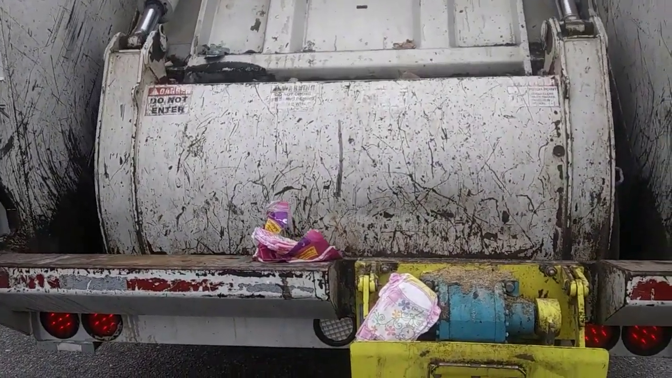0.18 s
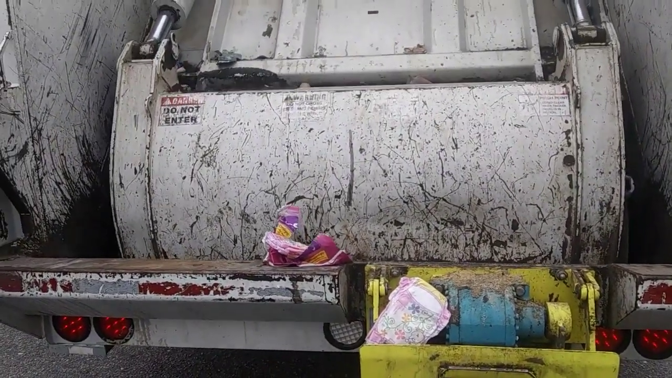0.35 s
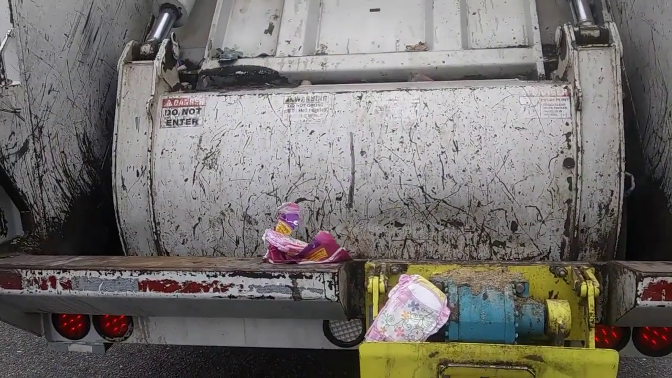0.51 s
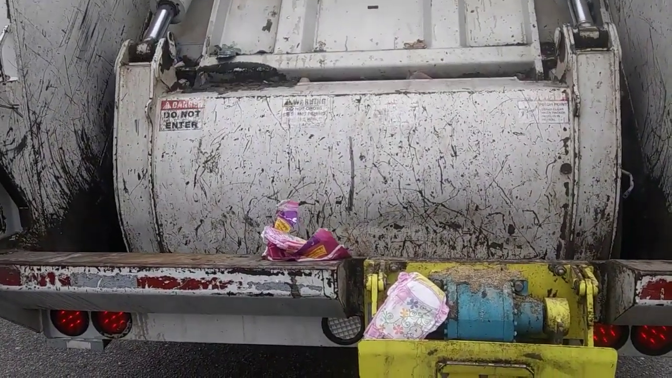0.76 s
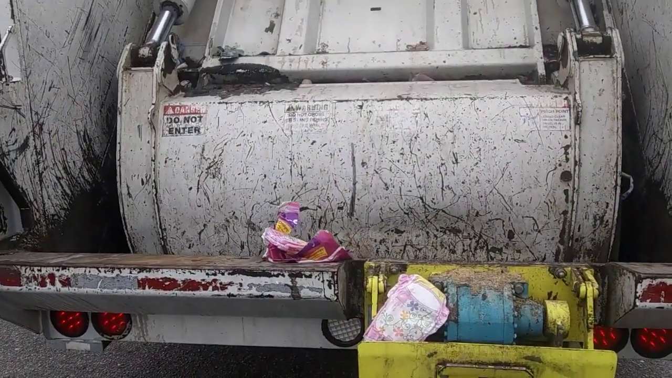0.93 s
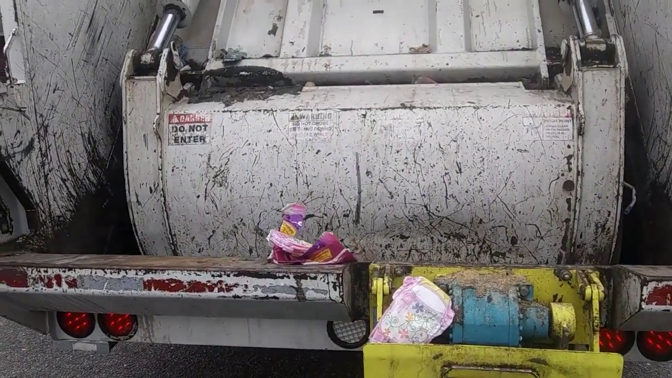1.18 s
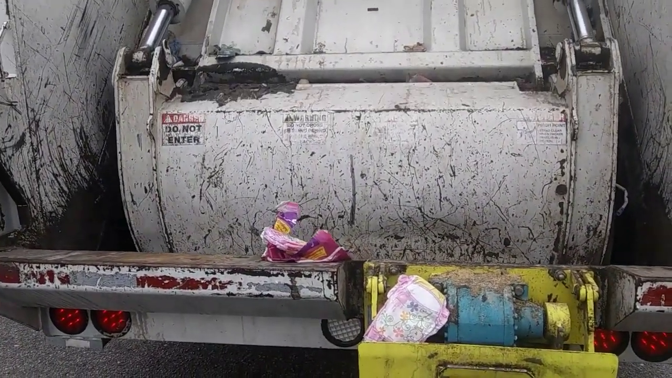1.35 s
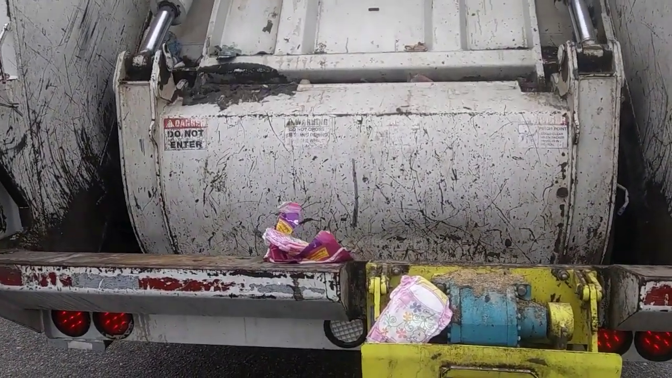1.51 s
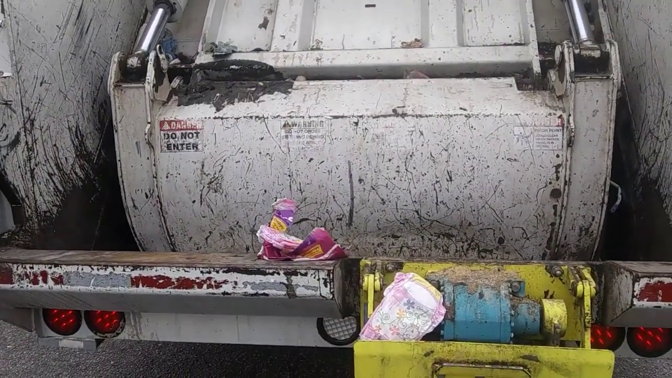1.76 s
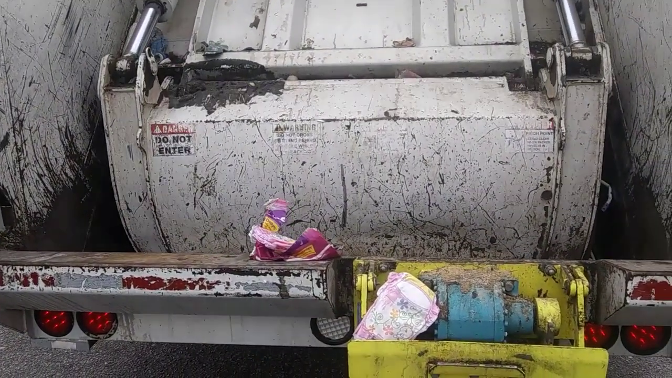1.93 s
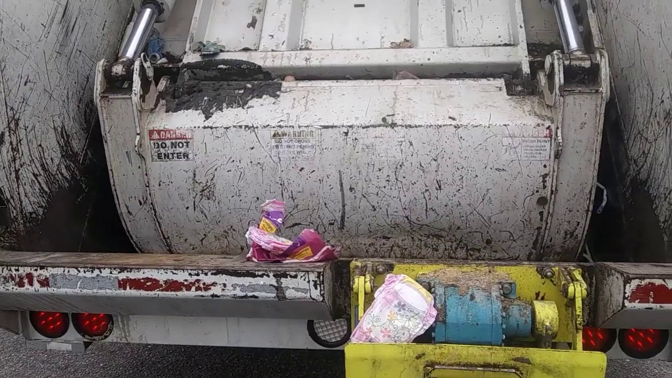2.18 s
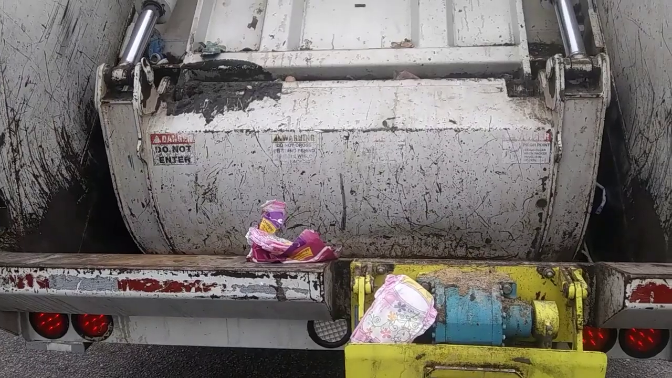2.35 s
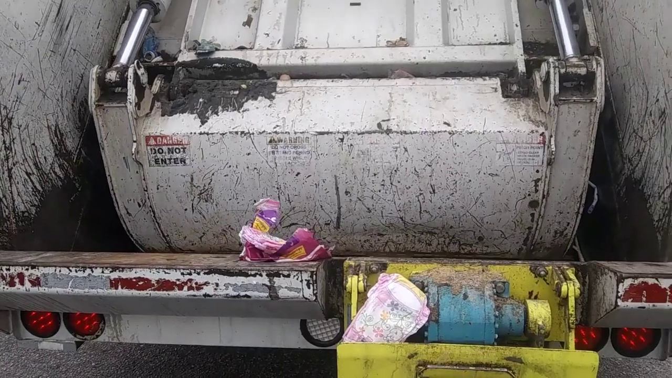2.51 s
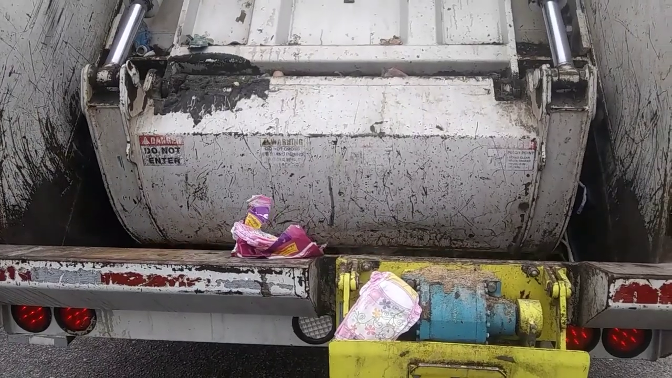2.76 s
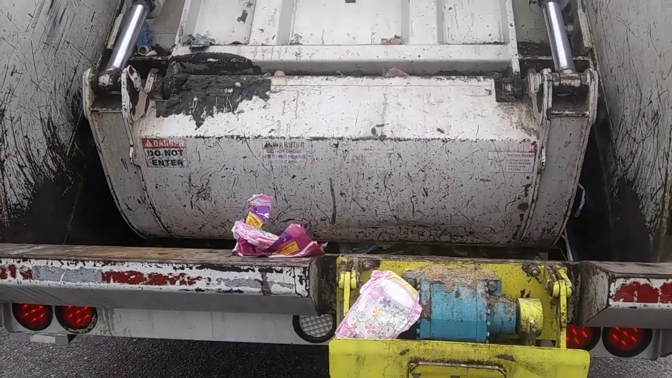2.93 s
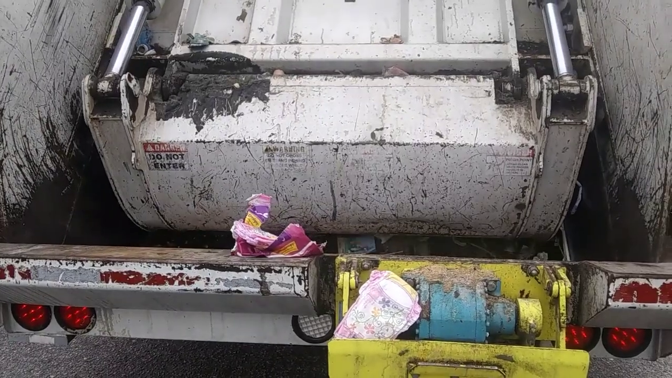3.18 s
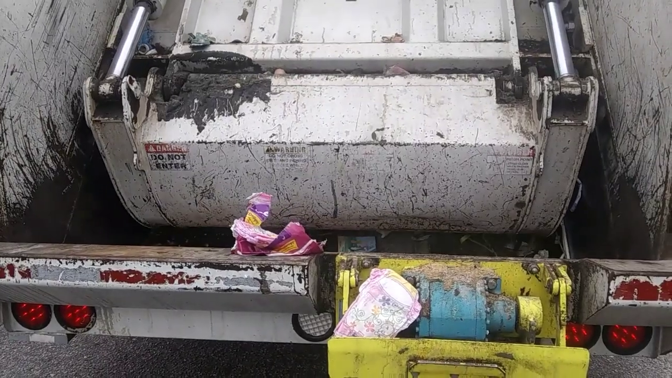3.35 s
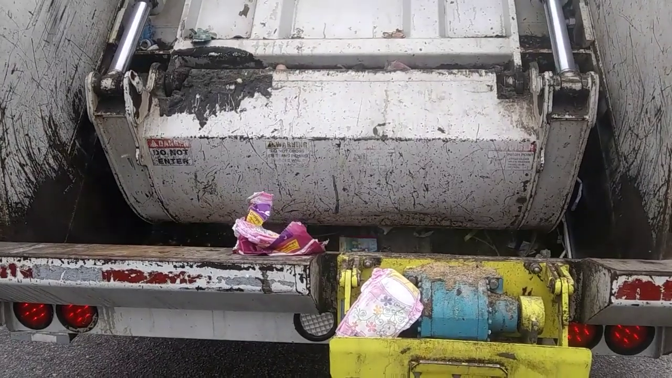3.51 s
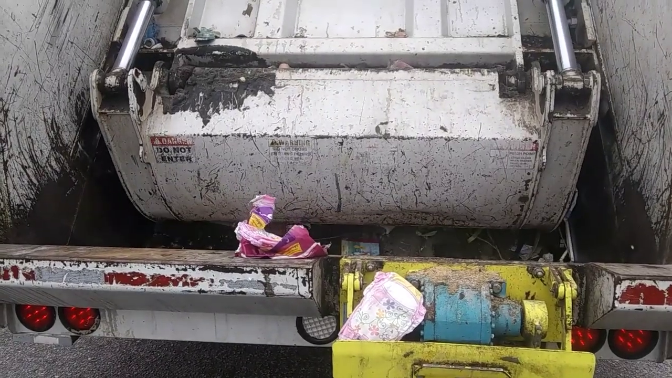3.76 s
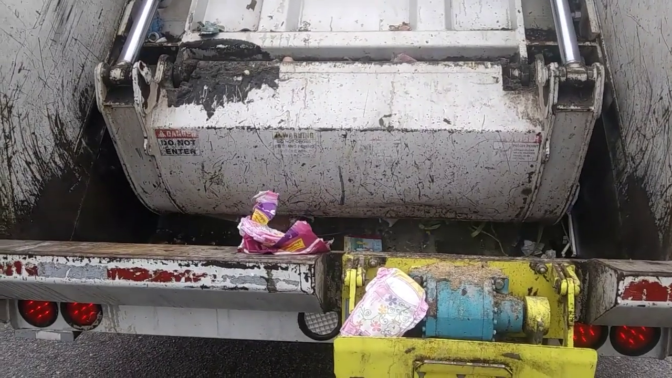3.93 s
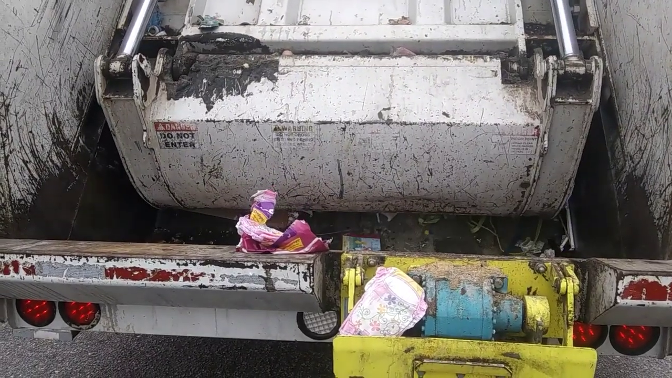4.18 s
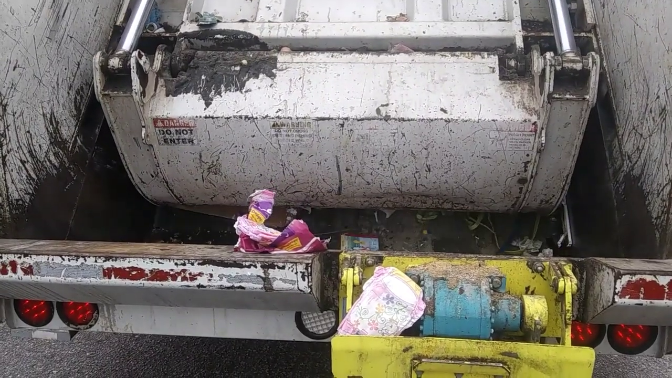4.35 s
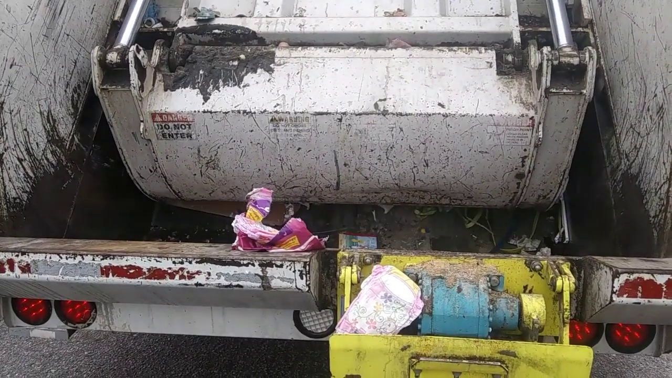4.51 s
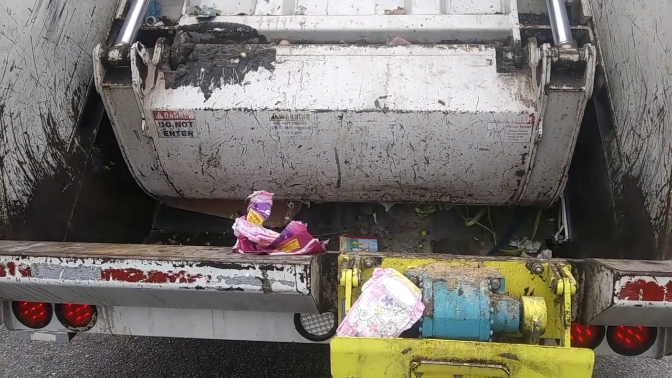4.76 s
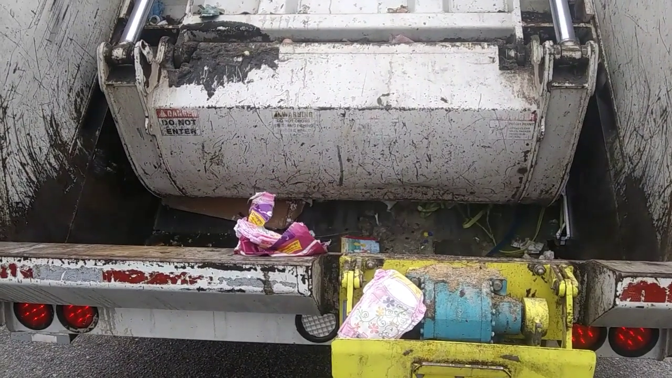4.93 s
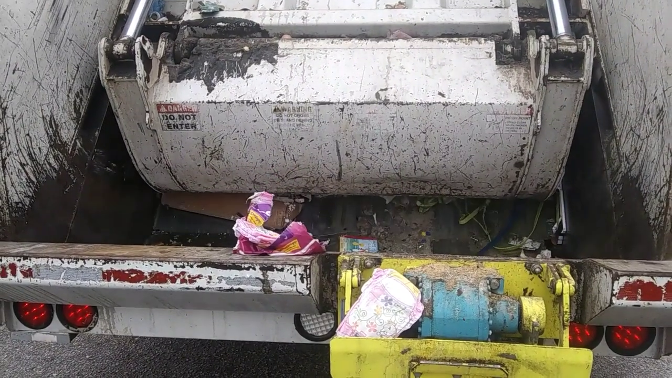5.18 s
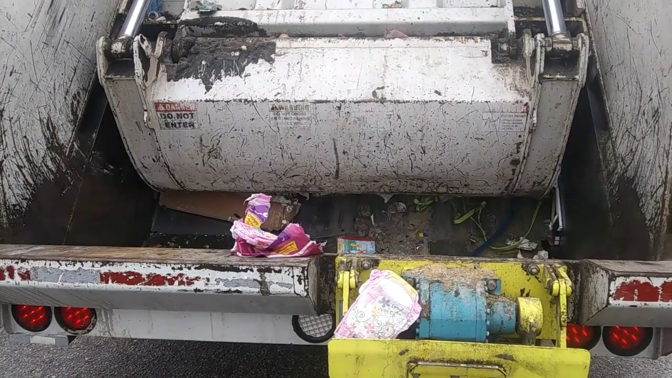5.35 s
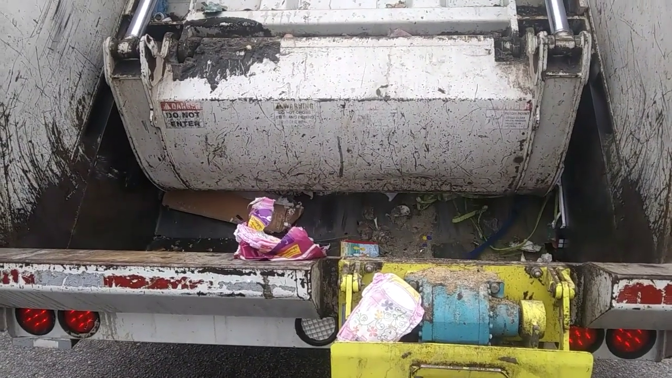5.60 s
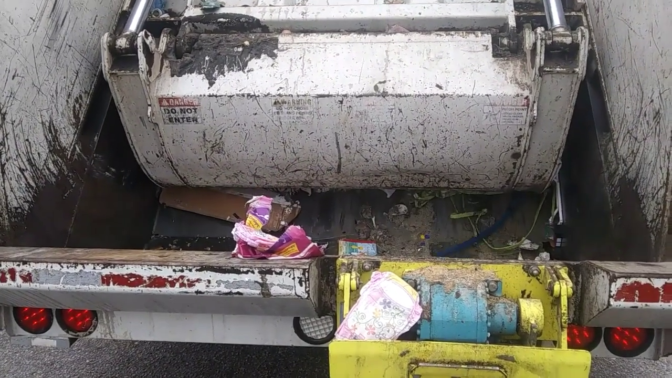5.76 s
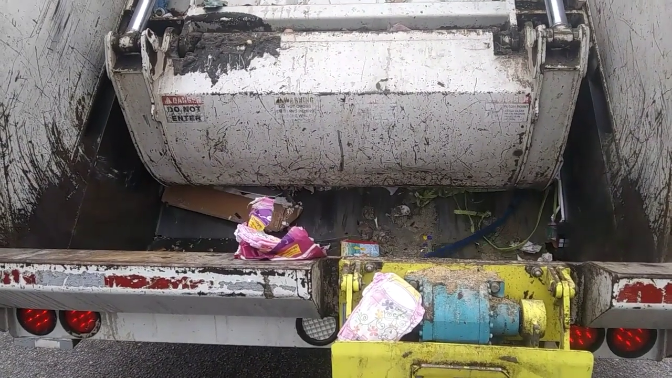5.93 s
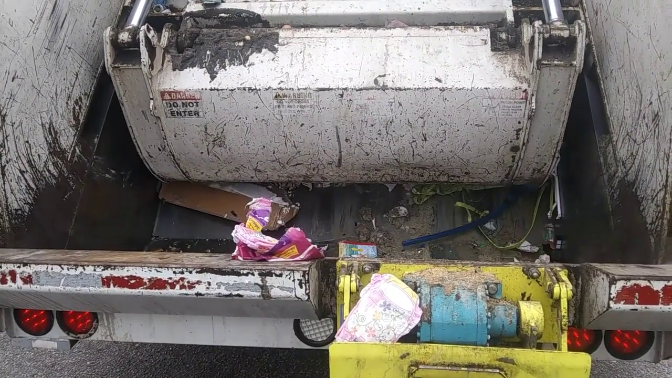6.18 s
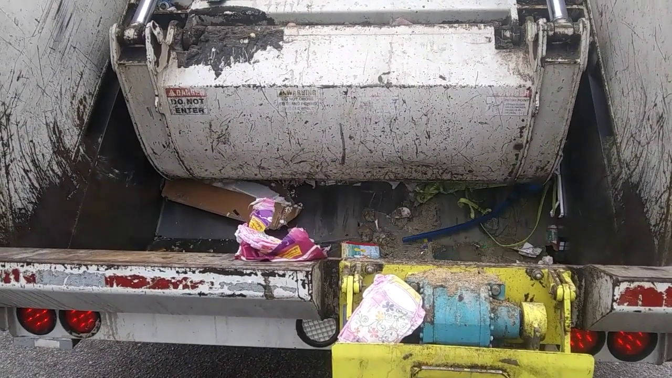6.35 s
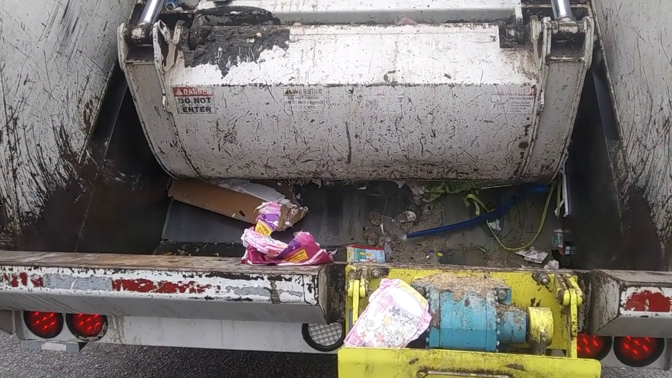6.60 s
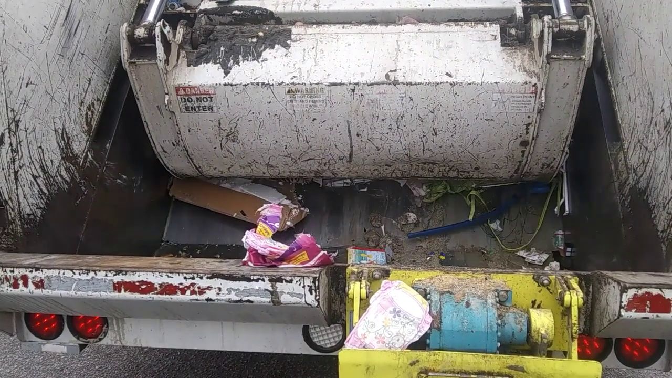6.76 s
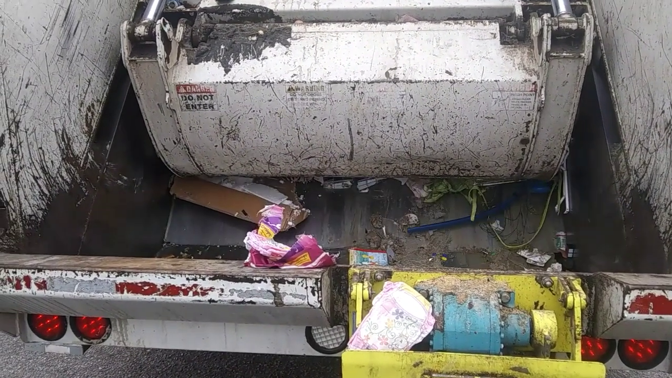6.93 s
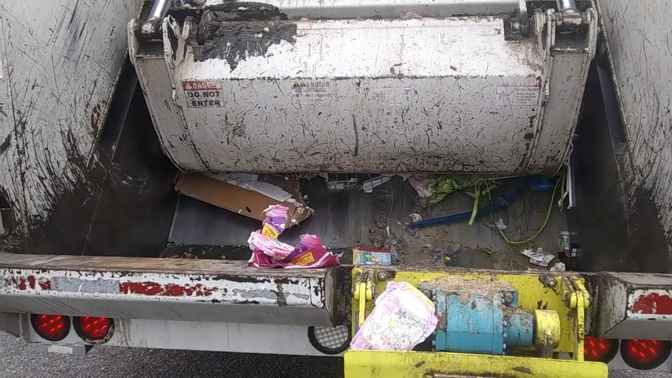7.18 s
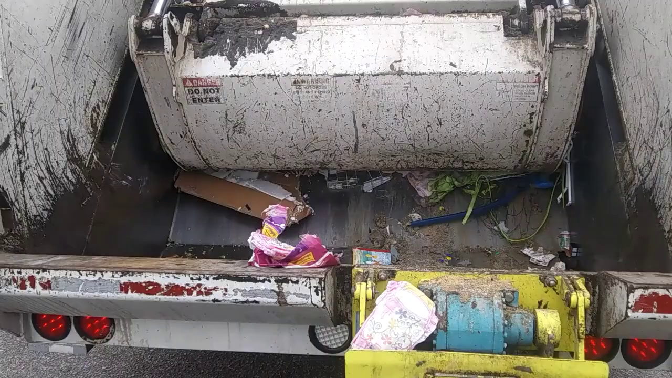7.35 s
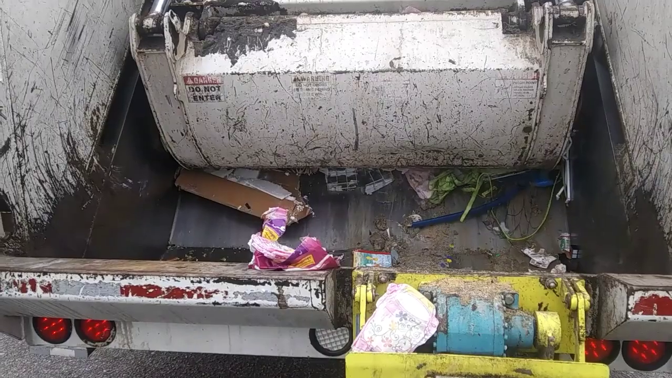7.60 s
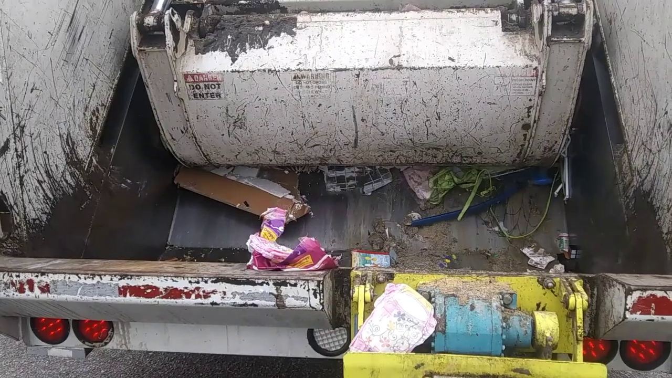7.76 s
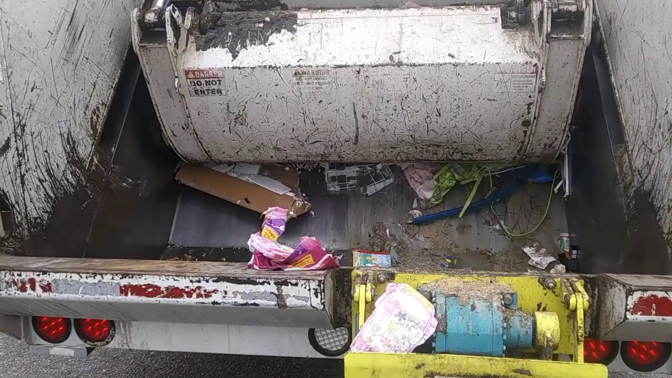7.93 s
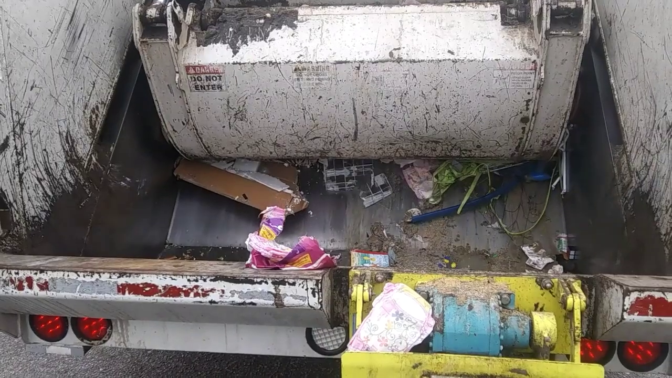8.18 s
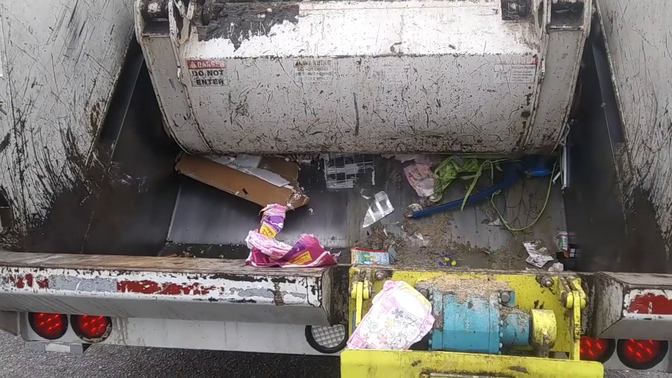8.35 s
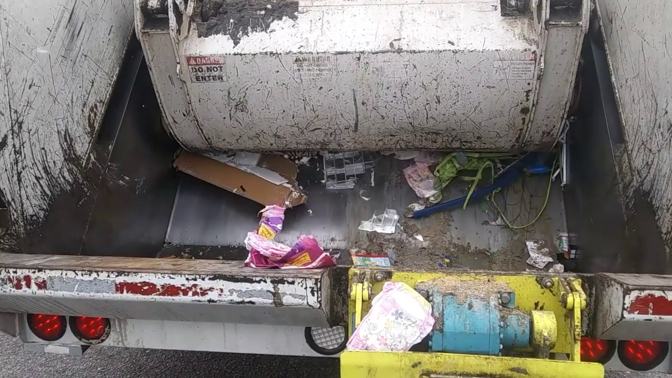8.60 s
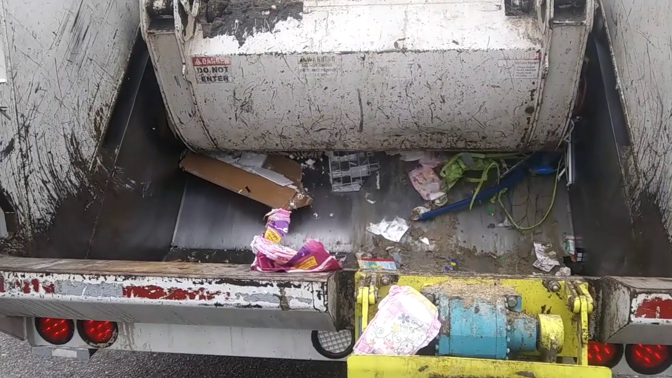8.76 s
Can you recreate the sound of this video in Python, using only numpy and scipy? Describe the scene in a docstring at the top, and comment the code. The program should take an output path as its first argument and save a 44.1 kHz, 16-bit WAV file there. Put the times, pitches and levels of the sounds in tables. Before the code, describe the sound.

Over a hydraulic hum and engine roar, trash starts to crack and crunch in a garbage truck, with hollow steel booms and thumps.

```python
"""Trash snaps and crunches as a refuse truck's packer blade sweeps it through the steel hopper.
The breaking pieces push on the steel, which booms along, and heavy ones thump the floor.
Before the crush, one soft thump, faint ticks and squeaks join the hydraulic pump's hum and the
engine's roar, which run throughout. A small camera a few metres away hears it all: its housing
colours the treble and its limiter holds down the peaks."""
import sys
import numpy as np
from scipy import signal
from scipy.io import wavfile
from scipy.ndimage import uniform_filter1d, minimum_filter1d

SR = 44100
rng = np.random.default_rng(int(sys.argv[2]) if len(sys.argv) > 2 else 0)


def to_wav(s):
    """Save 16-bit WAV."""
    ch = np.atleast_2d(s).T  # columns
    pcm = np.round(np.clip(ch, -1, 1) * 32767)  # PCM
    wavfile.write(sys.argv[1], SR, pcm.astype(np.int16))


N = 388521

# Single pieces breaking. Each row: start in seconds, level in dB, ring pitch in Hz,
# then push on the steel and treble, both in dB above that level.
BIG_SNAPS = [(2.2517, -39.5, 1610, -6, -15), (2.4649, -29, 990, 4.5, -8.5), (2.5551, -45, 1070, 18, -5.5),
             (2.8837, -43, 2200, 13, -2), (2.9229, -35.5, 1000, 13.5, -19), (3.05, -41, 760, 18.5, -25),
             (3.0815, -31, 1080, 16.5, -12), (3.1907, -27, 1070, 16, -27), (3.2151, -20, 1280, 6, -24),
             (3.3077, -18, 1150, 7, -5), (3.4521, -17.5, 1360, 9.5, -25), (3.885, -33, 970, 4, -7.5),
             (4.0658, -28, 1023, 12.5, -9), (4.321, -31.5, 990, 6, -5), (4.4016, -45, 1010, 25.5, -11),
             (4.5373, -30.5, 1270, 13, -6), (4.581, -36.5, 1118, 8, -2), (4.6675, -38.5, 1086, 20, -12),
             (4.8632, -43.5, 2240, 19.5, 1.5), (4.9677, -31, 980, 17, -14), (5.018, -31, 2370, -6, -4.5),
             (5.2644, -35, 2260, 7, -10), (5.2989, -32.5, 2200, 11, -8), (5.3264, -28, 2170, 13.5, -9.5),
             (5.3726, -32, 1090, 17, 0.5), (5.435, -29.5, 910, 4, -15), (5.5338, -18, 1840, 11.5, -5),
             (5.6509, -23.5, 1550, 9, -7.5), (5.7096, -28.5, 2370, 5, -5), (5.9328, -29.5, 1720, 10.5, -10),
             (5.9724, -31.5, 4280, 9, -4.5), (6.2389, -36, 2360, 12.5, -7.5), (6.335, -29, 1430, 14, -11),
             (6.4353, -36.5, 2370, 12.5, -4.5), (6.549, -27.5, 1400, -13, -3),
             (6.6174, -22, 1590, 9.5, -6.5), (6.6732, -36.5, 1440, 17, -8),
             (6.7418, -15.5, 1420, 10.5, -5.5), (6.8117, -34, 1317, 12, -11), (6.8776, -25.5, 1190, 1, -7),
             (6.979, -31, 2420, -1, -7), (6.991, -27.5, 2170, 7, -10), (7.0532, -32, 1720, 13, -3.5),
             (7.0836, -24.5, 2580, 12, -3), (7.167, -35.5, 1880, 16.5, -8), (7.2832, -24, 1340, -16, -2),
             (7.295, -31, 2700, 10, 0.5), (7.5332, -29.5, 1240, 5, -4.5), (7.6869, -31.5, 2050, 10, -10),
             (7.8317, -29, 1390, 13, -9.5), (7.9505, -29, 2420, 1, -5), (7.967, -27, 2320, 10.5, -4.5),
             (8.0028, -20, 2240, -1, -6), (8.1172, -30, 1260, 7, -1), (8.1679, -20, 1252, 0, -8.5),
             (8.258, -25, 2300, -10, -6), (8.3545, -21.5, 1090, 2, -5), (8.4512, -19.5, 2010, -12, -3.5),
             (8.4813, -23, 3630, -14, -10.5), (8.5529, -27.5, 1460, 6, -13), (8.603, -14, 2000, -48, -1.5),
             (8.6704, -27, 2520, -23, 4)]
# Trash grinding under the blade. Each row: time in seconds, crackle in dB, steel boom in dB.
GRIND_LEVELS = [(2.8, -70.5, -50), (3.02, -36.5, -34.5), (3.6, -37, -29), (3.801, -50, -31.5),
                (4.95, -39, -31.5), (5.1, -42, -41), (5.35, -35.5, -31), (5.7, -38, -28.5), (6.1, -39, -58),
                (6.8, -34, -23.5), (7.1, -36, -34.5), (7.42, -36, -40), (7.98, -32.5, -29),
                (8.81, -33.5, -29)]
# Large pieces tearing. Each row: start in seconds, hold in seconds, crackle in dB, steel boom in dB.
TEARS = [(3.161, 0.078, -26.5, -18.5), (3.304, 0.073, -12.5, -7.5), (3.443, 0.025, -15.5, -29),
         (8.346, 0.033, -17.5, -32)]
# The tone of cracking trash. Each row: frequency in Hz, relative level in dB.
CRACK_TONE = [(500, 6.5), (900, 0.5), (2400, 0), (3200, -6), (4300, -4), (5300, -20), (6500, -28),
              (9000, -102)]
# The camera housing's resonance. Each row: frequency in Hz, relative level in dB.
HOUSING_TONE = [(6500, -24), (9300, -6), (11000, -11.5), (13000, -14), (17000, -22)]
# The notes the steel tub rings at. Each row: pitch in Hz, width in Hz, gain in dB.
HOPPER_NOTES = [(164.5, 36, -8), (228, 49, 1), (354, 153, 4), (657, 91, 4.5), (786, 81, 4), (961, 220, 1.5)]
# Heavy pieces hitting the floor, and two steel rings set off by the big tear near 3.3 s. Each row: start in
# seconds, # level in dB, pitch in Hz, seconds to fade by 60 dB.
THUMPS_AND_RINGS = [(0.655, -25, 247, 0.14), (3.35, 1, 237, 0.32), (3.345, -4.5, 656, 0.67),
                    (3.35, -4.5, 814, 0.26), (7.166, -3.5, 210, 0.076), (8.5, 6, 255, 0.039)]
# The sliding blade squeaking. Each row: start in seconds, level in dB, pitch in Hz.
BLADE_SQUEAKS = [(1.215, -62, 12600), (1.318, -54, 8650), (1.468, -54, 13850)]
# The pump's hum, shifting with oil pressure. Each row: time in seconds, then harmonics 1, 2, 3 in dB.
PUMP_LEVELS = [(0, -25, -37.5, -41), (1.6, -27.5, -48.5, -45.5), (2.9, -25.5, -37.5, -43),
               (3.7, -22.5, -29.5, -43), (4.9, -20.5, -32.5, -36), (5.2, -22.5, -30.5, -42),
               (6.4, -23, -36.5, -41), (7.6, -19, -24.5, -40), (8.2, -22, -28.5, -44),
               (8.81, -23, -29, -35)]
# The pump's note. Each row: time in seconds, pitch in Hz.
PUMP_NOTE = [(0, 300.3), (4.3, 300.3), (8.81, 298.6)]
# The tone of the engine and fan. Each row: frequency in Hz, relative level in dB.
ROAR_TONE = [(55, -56), (95, -20.5), (135, -13.5), (240, 1.5), (430, -4), (800, 1), (1100, -2.5),
             (2300, -18), (4400, -37), (5600, -54), (7000, -56), (9300, -47.5), (17000, -51)]
# Engine notes that stand out of the roar. Each row: pitch in Hz, level in dB.
ENGINE_NOTES = [(141, -53.5), (812, -51.5), (1003, -46.5)]


def snaps(rows, decay_s, rise_s):
    """Each break is a ragged, dying burst with two ringing pitches. Gives crack, treble, push on steel."""
    out, t = np.zeros((3, N)), np.arange(6000) / SR
    for start_s, db, hz, push_db, treble_db in rows:
        noise = rng.standard_normal((4, len(t)))
        second_hz = hz * rng.uniform(1.25, 2.38)
        age = t / (decay_s * gain_of(0.27 * push_db))  # heavy pieces boom more and rattle longer
        splinters = gain_of(2.6 * unit_rms(uniform_filter1d(noise[3], 120)) * np.minimum(t / 0.008, 1))
        shape = (gain_of(-200 * age) + 0.84 * splinters * gain_of(-60 * age)) * np.minimum(t / rise_s, 1)
        crack, treble, push = gain_of(db) * shape * noise[:3]
        crack = 1.7 * crack + 1.4 * resonate(crack, hz, 260) + .6 * resonate(crack, second_hz, 330)
        clumps_db = 3.5 * unit_rms(uniform_filter1d(noise[2], 90))
        treble *= gain_of(treble_db - 36 * age + clumps_db) * np.minimum(t / 0.002, 1)  # dies first
        push *= gain_of(push_db)
        at = round(start_s * SR)
        out[:, at:at + len(t)] += np.array([crack, treble, push])[:, :N - at]
    return out


def crackles(count=720):
    """Small bits snap at random, following the grind's level; the smallest are the brightest."""
    times, grind_db, _ = np.transpose(GRIND_LEVELS)
    when, size, pitch, bright = rng.random((count, 4)).T
    start_s = when * times[-1]
    around_db = np.interp(start_s, times, grind_db, left=-51)  # loose debris ticks before the crush
    db = around_db - 9.5 + 14 * size ** 3
    hz, push_db, treble_db = 1000 * 3.6 ** pitch, 4.5 - 9 * pitch, -16 + 18 * bright - 8 * size
    return snaps(zip(start_s, db, hz, push_db, treble_db), decay_s=.045, rise_s=0.0022)


def grind_strength(rise_s=0.011):
    """Crackle and boom gains: the slow grind plus each tear, which swells fast, holds and dies away."""
    t, level = np.arange(N) / SR, gain_of(follow(GRIND_LEVELS))
    for start_s, hold_s, crackle_db, boom_db in TEARS:
        fading_s = np.maximum(t - start_s - rise_s - hold_s, 0)
        swell = np.clip((t - start_s) / rise_s, 0, 1) ** 2
        level += swell * gain_of([crackle_db - 400 * fading_s, boom_db - 137.5 * fading_s])
    return level * (t > GRIND_LEVELS[0][0])


def crunch():
    """Grinding trash makes a flickering noise and shakes the steel. Gives crack, treble, push."""
    crackle, boom = grind_strength()
    crackle *= gain_of(4.9 * wander(90))
    noise = rng.standard_normal((3, N))
    crack = resonate(noise[0], 1040, 1700) * crackle * gain_of(-6.5)  # duller than the snaps
    treble = noise[1] * crackle * gain_of(-23 + 2.8 * wander(60))
    push = noise[2] * boom * gain_of(2.8 * wander(30))
    return np.array([crack, treble, push])


def hopper(push):
    """The steel tub rings at its own notes when pushed, and heavy pieces thump its floor."""
    boom = .5 * sum((-1) ** k * gain_of(db) * resonate(push, hz, width_hz)
                    for k, (hz, width_hz, db) in enumerate(HOPPER_NOTES))
    band = signal.butter(4, [125, 1600], "band", fs=SR, output="sos")
    return signal.sosfilt(band, boom + fading_tones(THUMPS_AND_RINGS))


def squeaks(fade_s=.06):
    """The sliding blade gives short, high squeaks."""
    return fading_tones([(*row, fade_s) for row in BLADE_SQUEAKS])


def pump():
    """The pump's pressure pulses make a clean hum that wavers a little."""
    first_db, second_db, third_db = follow(PUMP_LEVELS)
    hz = follow(PUMP_NOTE)[0] + 0.36 * wander(3) + 1.11 * wander(25)
    phase = 2 * np.pi * np.cumsum(hz) / SR
    levels_db = [first_db + 1.03 * wander(30), second_db + 1.93 * wander(16), third_db + 3 * wander(7.2)]
    return sum(np.sqrt(2) * gain_of(db) * np.sin(k * phase) for k, db in enumerate(levels_db, 1))


def engine(width_hz=35):
    """A broad roar with a few fuzzy notes, louder as the pump loads the engine."""
    noise = rng.standard_normal((2, N))
    load_db = 0.32 * (follow(PUMP_LEVELS)[0] - PUMP_LEVELS[0][1])
    notes = np.zeros(N)
    for hz, db in ENGINE_NOTES:
        note = resonate(resonate(noise[1], hz, width_hz), hz, width_hz)
        notes += gain_of(db + 3 * wander(4.5)) * unit_rms(note)
    roar = gain_of(-30 + .5 * wander(3.4)) * coloured(noise[0], ROAR_TONE)
    return gain_of(load_db) * (roar + notes)


def fading_tones(rows, rise_s=0.0093):
    """Pure tones that start softly and die away."""
    out, t = np.zeros(N), np.arange(N) / SR
    for start_s, db, hz, fade_s in rows:
        age = np.maximum(t - start_s, 0)
        out += gain_of(db - 60 * age / fade_s) * np.minimum(age / rise_s, 1) * np.sin(2 * np.pi * hz * age)
    return out


def resonate(x, hz, width_hz):
    """Makes a sound ring at one pitch; white noise keeps its power."""
    r = np.exp(-np.pi * width_hz / SR)
    pole = r * np.exp(2j * np.pi * hz / SR)
    return np.sqrt(2 * (1 - r ** 2)) * signal.lfilter([1], [1, -pole], x).real


def coloured(x, tone):
    """Filters a sound to follow a tone table; white noise keeps its power."""
    hz, db = np.transpose(tone)
    grid_hz = abs(np.fft.fftfreq(8192, 1 / SR))
    log_gain = np.log(gain_of(np.interp(np.log(grid_hz + 1), np.log(hz), db, left=-100, right=-100)))
    taps = np.fft.ifft(np.exp(np.conj(signal.hilbert(log_gain)))).real[:4096]  # rings only after a hit
    return signal.oaconvolve(x, taps / np.linalg.norm(taps))[:len(x)]


def wander(top_hz):
    """A smooth random wobble of typical size 1, no faster than top_hz."""
    t = np.arange(0, N, 64) / SR
    rates = top_hz * np.geomspace(.05, 1, 24)
    wobble = sum(np.sin(2 * np.pi * (hz * t + rng.random())) / np.sqrt(hz) for hz in rates)
    return np.interp(np.arange(N) / SR, t, unit_rms(wobble))


def follow(rows):
    """Joins a time table's rows with straight lines, giving each column at every sample."""
    times, *columns = np.transpose(rows)
    return [np.interp(np.arange(N) / SR, times, column) for column in columns]


def gain_of(db):
    """Turns decibels into a multiplier."""
    return 10 ** (np.asarray(db) / 20)


def unit_rms(x):
    """Scales a signal to a typical size (rms) of 1."""
    return x / np.sqrt(np.mean(x ** 2) + 1e-20)


def scene():
    """Trash, steel, blade, pump and engine at one microphone."""
    crack, treble, push = snaps(BIG_SNAPS, decay_s=0.098, rise_s=0.00064) + crackles() + crunch()
    trash = coloured(crack, CRACK_TONE) + coloured(treble, HOUSING_TONE)
    return (trash + hopper(push) + squeaks() + pump() + engine())[None]


def record(dry, ceiling_db=-3, recover_db_per_s=340, cutoff_hz=15750):
    """A quick limiter turns down the loud peaks; then the highest treble is cut."""
    peak_db = 20 * np.log10(abs(dry) + 1e-9)
    recovery_db = np.arange(N) / SR * recover_db_per_s
    held_db = np.maximum.accumulate(peak_db + recovery_db, axis=1) - recovery_db
    cut_db = np.maximum(held_db - ceiling_db, 0)
    cut_db = uniform_filter1d(-minimum_filter1d(-cut_db, 41), 41)  # eases in just before each peak
    lowpass = signal.firwin(511, cutoff_hz, window=("kaiser", 9), fs=SR)
    return signal.oaconvolve(dry / gain_of(cut_db), lowpass[None], "same")


dry = scene()
out = record(dry)
to_wav(out)
```